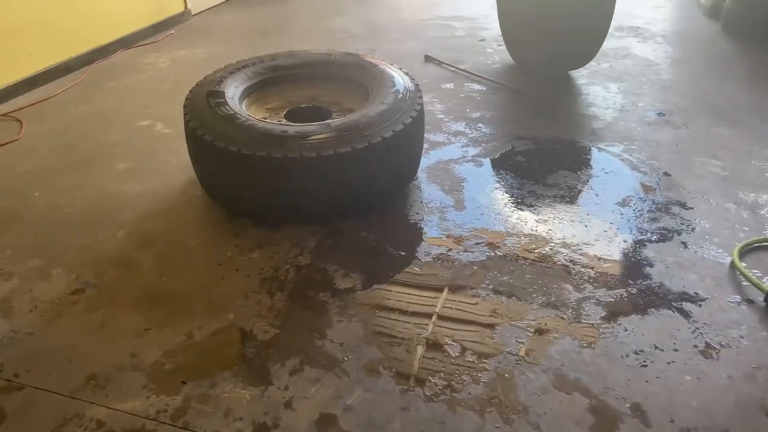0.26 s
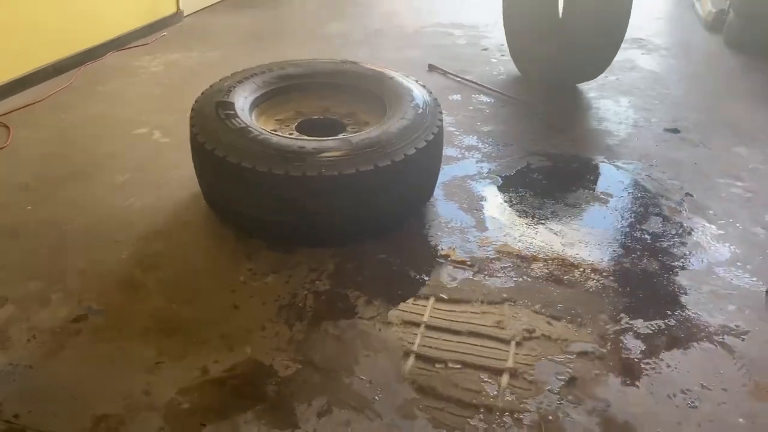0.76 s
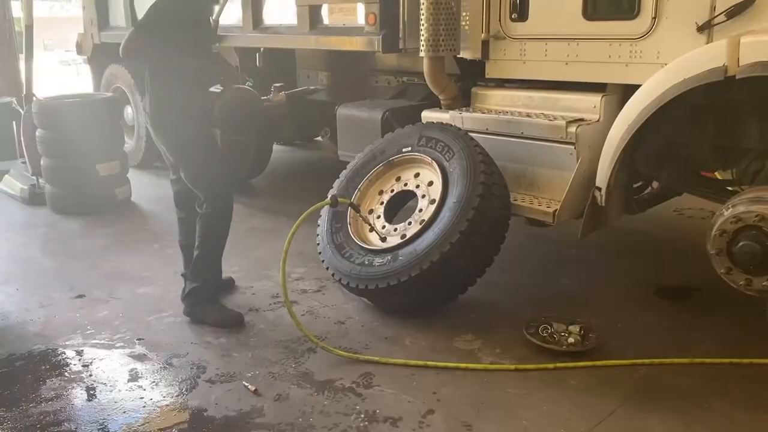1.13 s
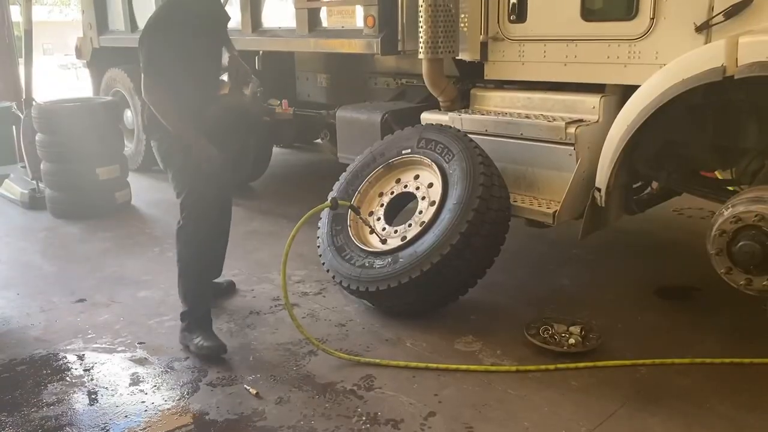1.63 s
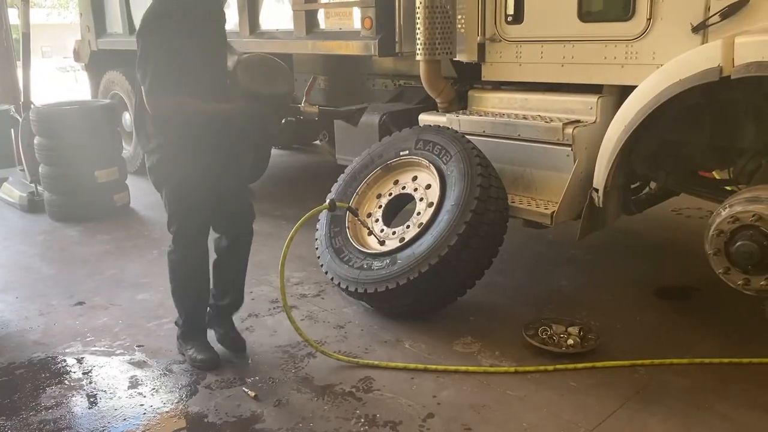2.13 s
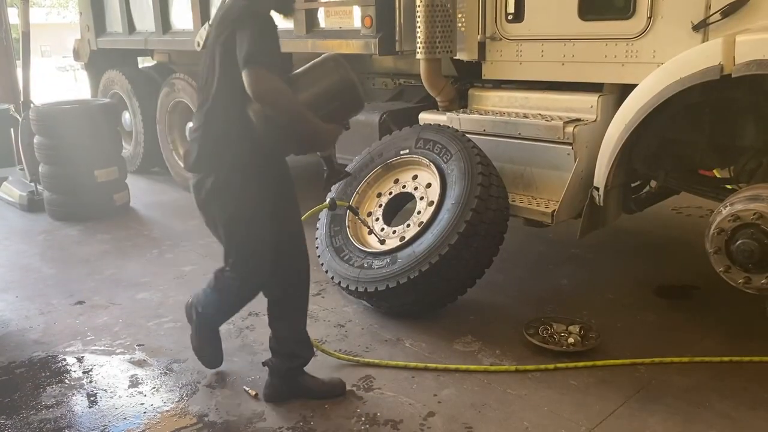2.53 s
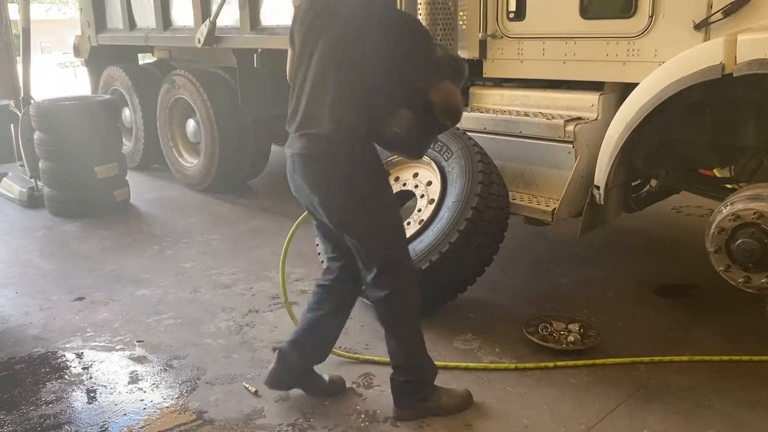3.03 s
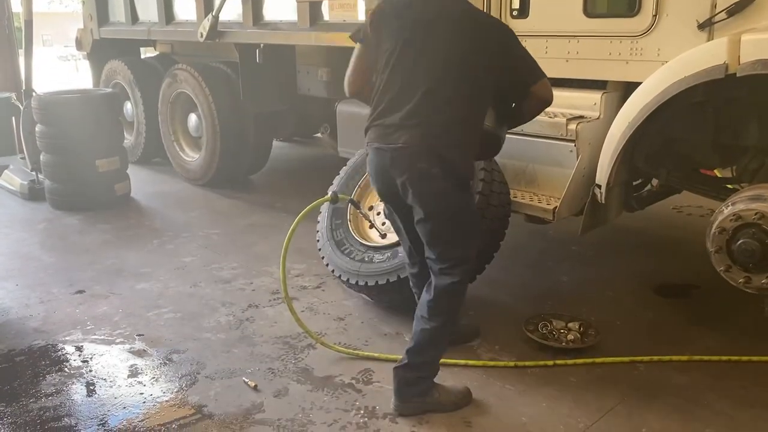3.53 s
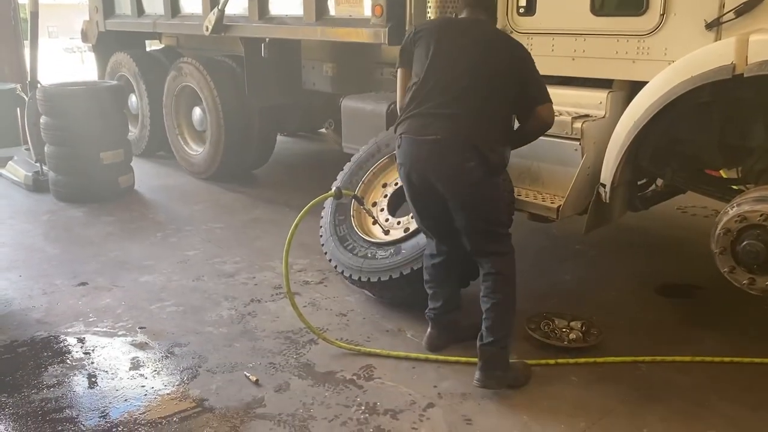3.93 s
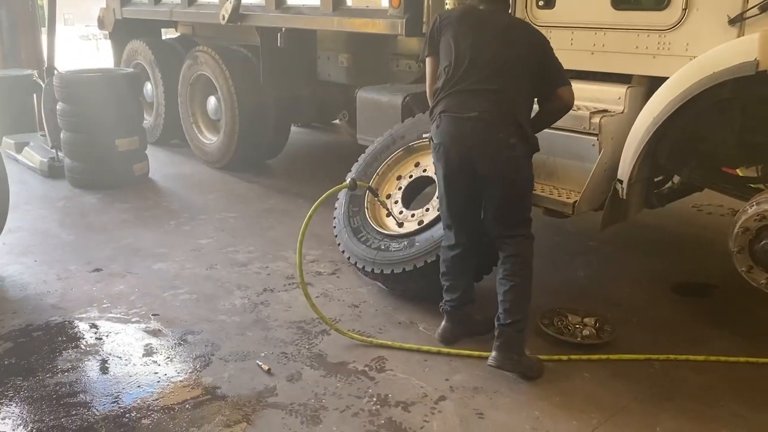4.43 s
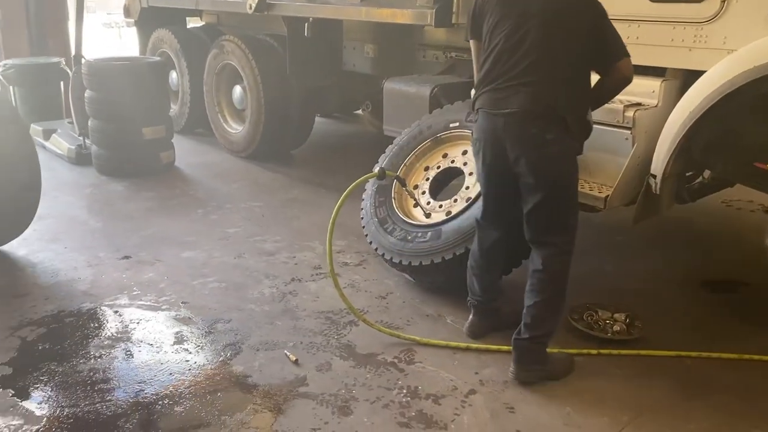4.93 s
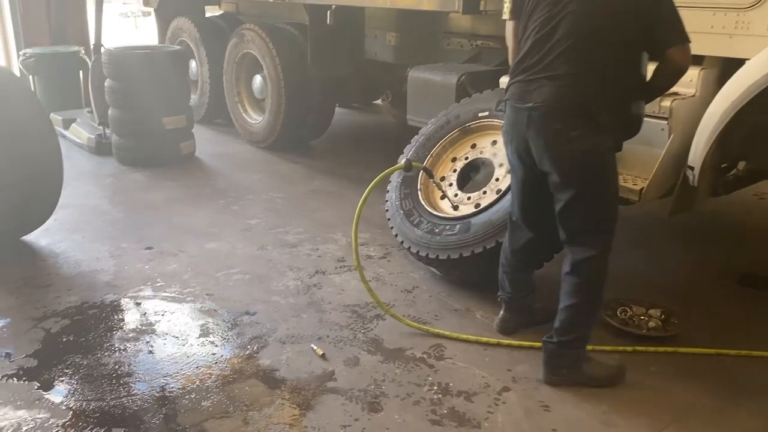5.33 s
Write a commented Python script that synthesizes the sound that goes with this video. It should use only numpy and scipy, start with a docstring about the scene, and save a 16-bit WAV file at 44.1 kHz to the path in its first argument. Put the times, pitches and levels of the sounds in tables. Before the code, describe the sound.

A quiet workshop wash with draught and soft knocks on the handheld microphone cuts abruptly to a bright, steady hose hiss with faint whistles, escaping past a truck tire's loose bead. Bumps and wind puffs continue. Steel clinks on the rim, then a tank fires one loud ragged air blast with a thump and short hoot; the hiss chokes off and the last air fades in the bay.

```python
"""Seating a truck tire, in two shots

In a workshop bay, a first shot has the shop alone; after a cut, hose air hisses and whistles past the loose bead:
coloured noise with narrow resonances. Through both, a draught and a hand bump the microphone: low noise puffs,
and decaying modes of its case. The barrel of an air tank clinks on the rim and fires one blast: noise through
resonances that shift as the gap narrows. The tire thumps, the blast hoots, the bead seals, the last air dies away."""
import sys
import numpy as np
from scipy import signal
from scipy.fft import rfft, irfft, next_fast_len
from scipy.io import wavfile

SR = 44100
rng = np.random.default_rng(int(sys.argv[2]) if len(sys.argv) > 2 else 0)


def unload_audio(sound):
    """Save the sound as a 16-bit wav file, at the path given as the first command line argument."""
    columns = np.transpose(np.atleast_2d(sound))
    # keep every value between -1 and 1, then stretch to whole-number steps
    steps = np.round(np.clip(columns, -1, 1) * 32767)
    wavfile.write(sys.argv[1], SR, steps.astype(np.int16))


N = 245637
TIME = np.arange(N) / SR
SIZE = next_fast_len(N + SR)
HZ = np.maximum(np.arange(SIZE // 2 + 1) * SR / SIZE, 1)
CUT_S = .952  # from the first shot to the second


def blast():
    """The tank dumps its air into the gap: a ragged roar whose resonances shift as the gap narrows."""
    # broad rush of the blast: f/Hz, relative level/dB per Hz
    rush_colour = [(150, -14), (400, -18), (780, -4), (1300, -7.5), (2100, -1), (2900, -2), (3700, -3),
                   (4300, -4), (5900, -2.5), (7000, -6), (8500, -12), (11000, -10), (15000, -21)]
    # resonances of the tank's barrel and the open gap: f/Hz, width/Hz, relative level/dB
    open_gap = [(970, 28, -10), (1520, 38, -7.5), (2320, 60, -9), (2796, 40, 1), (3130, 70, -2.5),
                (3576, 33, 1), (3770, 29, 3.5), (4460, 29, -5), (4820, 34, -6), (4715, 21, -5),
                (5420, 28, -1), (5760, 28, -2), (6260, 28, -2), (6430, 80, -3), (7060, 55, -6)]
    # resonances once the swelling tire has narrowed the gap: f/Hz, width/Hz, relative level/dB
    narrow_gap = [(2190, 120, 3.5), (2460, 47, -3), (2680, 25, -1), (2930, 110, -9), (3380, 45, -5),
                  (4650, 71, 5), (5800, 38, -3), (6340, 40, -2), (6900, 36, -1), (8100, 64, 1)]
    # the blast surges and sags as the tire starts to swell: t/s, gain/dB
    surges = [(4.474, 3.5), (4.488, 2), (4.499, 1.5), (4.511, 2.5), (4.526, 1.5), (4.536, -2.5),
              (4.55, 4.5), (4.615, 4.5), (4.648, 5), (4.7, -9)]
    # the valve's slam rings the tank's barrel: t/s, level/dB
    slam_hits = [(4.477, -30)]
    start_s, attack_s, hold_s, fall_db_per_s = 4.4705, .007, .02, 122
    narrows_after_s, narrows_for_s = 0.054, 0.024

    rush = turbulence(colour(rush_colour), side_db=-6.0) * from_db(-3)
    wide = turbulence(np.sqrt(resonances(open_gap)), side_db=-1.0) * from_db(-1.5)
    narrow = turbulence(np.sqrt(resonances(narrow_gap)), side_db=-1.0) * from_db(-6)
    narrowed = np.clip((TIME - start_s - narrows_after_s) / narrows_for_s, 0, 1)
    roar = torn(rush + wide * np.sqrt(1 - narrowed) + narrow * np.sqrt(narrowed))

    surge_db, = in_time(surges)
    rough_db = 1.4 * drift(rate=220)
    roar = roar * from_db(-13 + surge_db + rough_db) * envelope(start_s, attack_s, hold_s, fall_db_per_s)
    # a narrower resonance rings longer; the factor 1.6 stretches its decay
    barrel_modes = [(hz, db, np.log(1000) / (np.pi * width) * 1.6) for hz, width, db in open_gap]
    return roar + struck(slam_hits, barrel_modes)


def torn(x):
    """The jet tears unevenly: overlapping octave bands each swell and sag by themselves."""
    centres = 500 * 2 ** np.arange(5)
    out = 0
    for share in np.eye(len(centres)):
        octave = shaped(x, np.interp(np.log(HZ), np.log(centres), share))
        out = out + octave * from_db(2.0 * drift(rate=60))
    return out


def sidewalls():
    """The swelling sidewalls thump as a burst of low noise and bump the rim, ringing the tire's modes."""
    # the thump's low noise: f/Hz, relative level/dB per Hz
    thump_colour = [(35, -9), (70, 1), (170, -7), (330, 1), (600, -9), (1200, -16.5)]
    # bumps against the rim: t/s, level/dB
    bumps = [(4.545, -24.5), (4.563, -24.5)]
    # the tire's modes: f/Hz, relative level/dB, t60/s
    tire = [(88, -8, .12), (183, 0, .07), (332, -2, .04), (617, -2, .03)]
    thump = turbulence(colour(thump_colour), side_db=-1.0) * from_db(-26.5)
    thump = thump * envelope(4.54, attack_s=0.004, hold_s=0.025, fall_db_per_s=339)
    return thump + struck(bumps, tire)


def hoot():
    """The blast hoots in short sine notes, and the hollow tone swells in the tail; all sag and flutter."""
    # hoots and late swells: t/s, settled pitch f/Hz, level/dB, fall/dB per s
    notes = [(4.513, 791, -22.5, 450), (4.552, 1213, -14, 800), (4.573, 1099, -24.5, 380),
             (4.661, 1115, -39, 450), (4.706, 1240, -44, 500), (4.76, 1212, -37.5, 180),
             (4.85, 1215, -41, 292), (4.892, 1237, -47, 200), (5.03, 1218, -51, 78)]
    # each note starts sharp by a share of its pitch and settles
    attack_s, sharp_share, settle_s = 0.012, 0.042, 0.017
    out, waver = 0, 1 + 0.0167 * drift(rate=140)  # a rough pitch
    for s, hz, db, fall_db_per_s in notes:
        sag = 1 + sharp_share * np.exp(-np.maximum(TIME - s, 0) / settle_s)
        phase = 2 * np.pi * np.cumsum(hz * sag * waver) / SR
        # common part, and a weaker differing part a quarter cycle away
        tone = np.sqrt(2) * np.array([np.sin(phase), 0.45 * np.cos(phase)])
        out = out + tone * from_db(db) * envelope(s, attack_s, 0, fall_db_per_s)
    return out * from_db(2.5 * drift(rate=70))


def drain():
    """The last air leaves the tank as a hiss that gives out, and blows its barrel like a pipe."""
    # hiss of the emptying tank: f/Hz, relative level/dB per Hz
    drain_colour = [(600, -34), (900, -19), (1500, -6), (2100, -1), (3000, -2), (4000, -0.5), (5200, 0.5),
                    (6800, -3), (8500, -11), (11000, -15), (13000, -25), (15000, -46)]
    # the hollow tone's two resonances: f/Hz, width/Hz, relative level/dB
    hollow = [(1249, 59, 3.5), (1088, 130, 0)]
    attack_s, fall_db_per_s = 0.025, 67.5

    hiss = turbulence(colour(drain_colour) * near_echoes(share=0.24, longest_s=0.011), side_db=2.5)
    pipe_gain = sum(from_db(db) * resonance(hz, width) ** 2 for hz, width, db in hollow)
    tone = turbulence(pipe_gain, side_db=5.0)
    hiss = hiss * from_db(-34) * envelope(4.574, attack_s, 0.4, fall_db_per_s)
    tone = tone * from_db(-49) * envelope(4.745, attack_s, 0.32, fall_db_per_s)
    return hiss + tone


def hose():
    """A steady jet with faint whistles, in the second shot; the worker shades it, the sealing bead chokes it."""
    # hose air escaping past the bead: f/Hz, relative level/dB per Hz
    hiss_colour = [(1000, -15.5), (1400, -14), (1900, -9.5), (2400, -10), (3200, -6.5), (4200, -3.5),
                   (5600, -1), (7000, -.5), (11400, 1), (15200, -2)]
    # narrow resonances of the valve and the gap: f/Hz, width/Hz, level over the unshaded hiss/dB
    whistle_modes = [(2455, 37, 4), (2900, 78, 0.5), (3830, 54, 0), (5330, 160, 1), (6160, 140, 4),
                     (6520, 50, 6.5), (6800, 68, 9.5), (7380, 73, 4), (7740, 67, 7), (10320, 68, 6.5),
                     (11340, 90, 6.5)]
    bead_seals_s, seal_db_per_s = 4.6, 119
    # the worker steps in front of the jet
    shade_s, shade_takes_s = 3.07, 0.4
    shade = np.clip((TIME - shade_s) / shade_takes_s, 0, 1)

    air = turbulence(colour(hiss_colour), side_db=0.0)
    whistles = shaped(air, np.sqrt(1 + resonances(whistle_modes)) - 1)
    jet = air + whistles * from_db(-9 * shade + 0.97 * drift(rate=9.5))

    # the near echoes change as he walks about: two echo patterns trade places
    first = shaped(jet, near_echoes(share=0.52, longest_s=.024) - 1)
    second = shaped(jet, near_echoes(share=0.52, longest_s=.024) - 1)
    turn = 2 * np.pi * .55 * TIME  # 0.55 turns per second
    jet = rms_one(jet + np.cos(turn) * first + np.sin(turn) * second)

    # the sizzle, above some 7.5 kHz, is shaded more than the body
    body = shaped(jet, 1 / (1 + (HZ / 7500) ** 8))
    sizzle = jet - body
    jet = body * from_db(-21.5 - 1 * shade) + sizzle * from_db(-23.5 - 1.5 * shade)
    choke_db = seal_db_per_s * np.maximum(TIME - bead_seals_s, 0)
    return jet * (TIME > CUT_S) * from_db(0.43 * drift(rate=19.0) - choke_db)


def near_echoes(share, longest_s):
    """Floor, wheel and truck body return the jet within milliseconds and ripple its spectrum."""
    taps = np.zeros((2, SIZE))
    for channel in taps:
        delays = (rng.uniform(.1, 1, size=40) * longest_s * SR).astype(int)
        channel[delays] = rng.standard_normal(size=40)
    taps *= share / np.sqrt(np.sum(taps ** 2, axis=1, keepdims=True))
    taps[:, 0] = 1  # the direct sound
    return rfft(taps)


def clink():
    """Steel meets steel: the rim rings over a short, gritty scrape where the barrel lands."""
    # barrel touching the rim: t/s, level/dB
    touches = [(3.892, -26.5), (3.957, -38)]
    # the rim's steel modes: f/Hz, relative level/dB, t60/s
    rim = [(930, -6, .02), (1410, -8, 0.0079), (1890, 2, 0.1), (1890, -3, 0.11), (2342, 2, 0.051),
           (2940, 1, 0.037), (3720, -8, 0.083), (4600, -12, 0.018)]
    # grating of the barrel: f/Hz, relative level/dB per Hz
    grate_colour = [(800, -10), (1400, -3), (2100, 1), (3200, -3), (5000, -19), (10000, -35)]
    grit = turbulence(colour(grate_colour), side_db=3.0) * from_db(3.0 * drift(rate=320))
    # the scrape lies 8 dB under its touch
    scrape = sum(from_db(db - 8) * envelope(s, .001, .003, fall_db_per_s=300) for s, db in touches)
    return struck(touches, rim) + grit * scrape


def handling():
    """A hand knocks the microphone's case and wakes its modes; some knocks snap; scuffs rub as noise."""
    # knocks on the case: t/s, level/dB, f/Hz at which the contact rings
    knocks = [(0.122, -34, 560), (0.29, -33, 90), (0.337, -31, 447), (0.352, -30, 450), (0.36, -19.5, 420),
              (0.372, -32, 200), (0.402, -35, 564), (0.414, -26, 131), (0.629, -27, 290), (0.726, -30, 160),
              (0.798, -32, 220), (0.81, -36, 139), (0.823, -27, 420), (0.928, -30, 262), (1.009, -20, 413),
              (1.014, -22, 150), (1.024, -28, 189), (1.16, -33, 330), (1.172, -34, 202), (1.195, -31, 110),
              (1.198, -35, 445), (1.318, -29.5, 600), (1.337, -32, 474), (1.367, -28.5, 65),
              (1.415, -24.5, 560), (1.439, -19, 573), (1.442, -22, 240), (1.447, -19, 120),
              (1.461, -24, 302), (1.474, -27.5, 480), (1.488, -20, 98), (1.627, -27, 148),
              (1.805, -30.5, 170), (1.932, -25, 483), (1.939, -17.5, 188), (1.955, -26, 80),
              (1.995, -32, 298), (2.02, -35, 300), (2.094, -38, 220), (2.374, -35, 378),
              (2.422, -23.5, 230), (2.443, -16.5, 320), (2.54, -26.5, 260), (2.563, -29, 460),
              (2.639, -29.5, 360), (2.841, -17, 175), (2.85, -24, 330), (2.873, -22.5, 300),
              (2.892, -20, 190), (3.012, -23.5, 460), (3.037, -26, 210), (3.067, -23.5, 297),
              (3.138, -35, 450), (3.223, -34, 400), (3.298, -36, 480), (3.321, -27, 101), (3.469, -33, 232),
              (3.677, -32, 149), (3.798, -23.5, 242), (3.821, -24, 167), (3.86, -35, 220),
              (3.903, -33, 300), (3.966, -29, 189), (4.325, -20, 99), (4.354, -24.5, 382),
              (4.368, -23.5, 204)]
    # the case's modes before detuning: f/Hz, relative level/dB, t60/s
    case = [(67.5, -3, 0.33), (99, 2.5, 0.051), (220, -5.5, 0.041), (412, 5.5, 0.021), (572, -0.5, 0.031),
            (860, -7.5, 0.021)]
    # snaps with some of the knocks: t/s, level/dB, f/Hz above which the snap is dull
    snaps = [(0.358, -30, 2490), (0.402, -32, 1500), (1.4375, -18.5, 4000), (1.932, -29, 1400),
             (2.537, -28.5, 1100)]
    # the snap's modes: f/Hz, relative level/dB, t60/s
    snap_modes = [(694, 1.5, 0.014), (1010, 2.5, 0.0092), (1400, -5, .006), (2000, -7, .005),
                  (2600, 1, .004), (3250, 4, 0.0045)]
    # fingers scuffing the case: t/s, level/dB, fall/dB per s
    scuffs = [(0.357, -45, 480), (0.401, -52, 500), (1.438, -33, 900), (1.448, -37, 94), (1.93, -41, 699)]
    # noise of a scuff: f/Hz, relative level/dB per Hz
    scuff_colour = [(500, 0), (1000, -2), (2200, -3.5), (3500, -10), (6000, -28), (12000, -45)]
    out = 0
    for s, db, contact_hz in knocks:
        # each knock's case modes are detuned together at random, by up to a quarter octave
        detune = 2 ** (.2 * rng.uniform(-1.23, 1))
        ringing = [(contact_hz, -1, 8.7 / contact_hz)]  # dies 60 dB in 8.7 cycles
        for hz, mode_db, t60 in case:
            # modes far from the contact's pitch are woken less
            far_db = 10 * np.log10(1 + 1.7 * (hz / contact_hz - contact_hz / hz) ** 2)
            ringing.append((hz * detune, -5 + mode_db - far_db, t60))
        out = out + struck([(s, db)], ringing)
    for s, db, dull_hz in snaps:
        dulled = [(hz, mode_db - 10 * np.log10(1 + (hz / dull_hz) ** 8), t60)
                  for hz, mode_db, t60 in snap_modes]
        out = out + struck([(s, db)], dulled)
    rub = turbulence(colour(scuff_colour), side_db=2.0) * from_db(3.1 * drift(rate=500))
    return out + rub * sum(from_db(db) * envelope(s, 0.0029, .003, fall) for s, db, fall in scuffs)


def wind():
    """Draught on the microphone: strong and weak gusts over a rumble that swells around the strong ones."""
    # strong gusts: t/s, nominal length/s, level/dB before the puff's trim, corner f/Hz
    gusts = [(0.116, 0.059, -43.5, 350), (0.301, 0.038, -39, 170), (0.368, 0.025, -35, 200),
             (0.407, 0.031, -36, 180), (0.808, 0.023, -32.5, 202), (0.933, 0.039, -39, 300),
             (1.017, 0.021, -33, 282), (1.203, 0.079, -36, 130), (1.473, 0.092, -35, 210),
             (1.944, 0.031, -32.5, 188), (2.235, 0.048, -44, 79), (2.432, 0.042, -33.5, 190),
             (2.549, 0.025, -38, 200), (2.784, 0.038, -36.5, 70), (2.858, 0.056, -33.5, 191),
             (3.047, 0.057, -37, 250), (3.229, 0.036, -49.5, 231), (3.474, 0.027, -42.5, 170),
             (3.833, 0.1, -40, 220), (3.96, 0.029, -36, 160), (4.339, 0.052, -33, 125.5),
             (4.413, 0.013, -36.5, 80.6), (4.925, 0.084, -53, 257)]
    # course of the draught, which sets rumble and weak gusts: t/s, reference level/dB
    draught = [(0, -60), (.12, -52), (.42, -46), (.52, -47), (.8, -47), (1.08, -53), (1.4, -43.5),
               (1.62, -48), (1.71, -57), (1.82, -48.5), (2.14, -50), (2.52, -65), (2.8, -50), (3.3, -52.5),
               (3.6, -61), (4.2, -58), (4.5, -58), (4.68, -71), (4.82, -61), (5.15, -75), (5.57, -74)]
    # rumble of the draught: f/Hz, relative level/dB per Hz
    draught_colour = [(22, -28), (40, -1), (60, 5.5), (110, -1.5), (200, -11), (400, -15.5), (900, -71)]
    # how differently the eddies hit the two ports: t/s, gain of the differing part/dB
    wind_width = [(0.93, 6.5), (0.98, -2.5)]
    swell_db, swell_s = -8, 0.1

    draught_db, = in_time(draught)
    swells = sum(from_db(db + swell_db) ** 2 * np.exp(-((TIME - s) / swell_s) ** 2) for s, _, db, _ in gusts)
    level = np.sqrt(from_db(draught_db + 5) ** 2 + swells)
    rumble = turbulence(colour(draught_colour), side_db=2.0) * level * from_db(2.5 * drift(rate=17.0))
    common, differing = rumble + puffs(gusts + weak_gusts(draught_db, count=30))
    width_db, = in_time(wind_width)
    return np.array([common, differing * from_db(width_db)])


def weak_gusts(draught_db, count):
    """Small eddies scattered loosely through time, their level following the draught's."""
    over_db, spread_db, length_s, middle_corner_hz = 4, -1, 0.019, 300
    chance = rng.random((count, 3)) * 2 - 1
    at = ((np.arange(count) + .5 + .5 * chance[:, 0]) * N / count).astype(int)
    return [(i / SR, length_s, draught_db[i] + over_db + spread_db * strength, middle_corner_hz * 2 ** (.5 * size))
            for i, (_, strength, size) in zip(at, chance)]


def puffs(rows):
    """Each eddy hits the ports as a short puff of low-passed noise."""
    out, low_cut = np.zeros((2, N)), signal.butter(2, 55, "high", fs=SR, output="sos")
    for s, length, db, corner_hz in rows:
        near = np.flatnonzero(abs(TIME - s) < .15)
        eddy = signal.butter(2, corner_hz, fs=SR, output="sos")
        noise = rng.standard_normal((2, SR // 3))[:, :len(near)]
        puff = signal.sosfilt(np.vstack([low_cut, eddy]), noise)
        # a puff arrives faster than it leaves, and carries its level over its length
        age = (TIME[near] - s) / (0.59 * length)
        puff /= 1 + abs(age) ** np.where(age < 0, 5.0, 2.8)
        puff *= np.sqrt(length * SR / np.sum(puff ** 2, axis=1, keepdims=True))
        out[:, near] += from_db(db + 2.1) * puff
    return out


def shop():
    """A dull noise wash of distant machinery, louder in the first shot, much quieter after the cut."""
    # shop in the first shot: f/Hz, relative level/dB per Hz
    first_colour = [(500, -2.5), (1000, -4.5), (1600, -9), (2500, -6), (3500, -13), (5000, -14.5),
                    (6500, -21.5), (8000, -29.5), (11000, -36.5), (15000, -55.5)]
    # shop in the second shot: f/Hz, relative level/dB per Hz
    second_colour = [(60, -13), (150, -11), (400, -3), (700, -2.5), (1200, 2), (2500, -1), (5000, -5.5),
                     (8000, -13), (11000, -18), (15000, -22.5)]
    first = turbulence(colour(first_colour), side_db=5.0) * from_db(-45.5) * (TIME < CUT_S)
    second = turbulence(colour(second_colour), side_db=2.0) * from_db(-56.0) * (TIME >= CUT_S)
    return first + second


def bay(x, wet_db):
    """The bay's diffuse tail: noise in which each band dies at its own rate."""
    # reverberation of the bay: f/Hz, t60/s
    bay_t60 = [(100, 0.28), (600, 0.1), (1200, 0.72), (4000, 0.63), (8000, 0.45), (15000, 0.65)]
    t, tail = TIME[:SR], 0
    edges = np.geomspace(70, 17000, 9)
    for low, high in zip(edges, edges[1:]):
        band_pass = signal.butter(2, [low, high], "band", fs=SR, output="sos")
        band = signal.sosfilt(band_pass, rng.standard_normal((2, SR)))
        tail = tail + band * from_db(-60 * t / at_hz(bay_t60, np.sqrt(low * high)))
    tail = tail * (1 - np.exp(-t / 0.015))  # the tail builds up softly
    return x + from_db(wet_db) * shaped(x[0], rfft(rms_one(tail) / np.sqrt(SR), SIZE))


def microphones(x, lag_s, in_step_hz):
    """Two ports a few centimetres apart share some bands more than others; the right leads in the treble."""
    # left-right likeness for equal common and differing parts: f/Hz, correlation
    likeness = [(60, .8), (300, .6), (700, .25), (1300, .2), (2600, .5), (4200, .45), (5500, .2),
                (7000, .85), (8600, .995), (15000, .995)]
    # balance of the ports: f/Hz, left minus right level/dB
    lean = [(60, .5), (300, 1.7), (700, 1.6), (2000, -.5), (5500, -1.3), (8000, 0)]
    alike = np.clip(at_hz(likeness), -.998, .998)
    common, differing = shaped(x, np.sqrt([1 + alike, 1 - alike]) / np.sqrt(2))
    # half the lean and half the lag go to each port, in opposite senses
    lag = np.exp(-1j * np.pi * lag_s * np.maximum(HZ - in_step_hz, 0))
    turn = from_db(at_hz(lean) / 2) * lag
    return shaped(np.array([common + differing, common - differing]), np.array([turn, 1 / turn]))


def struck(hits, modes):
    """Each hit sets all modes of a body ringing as decaying sines, differently at the two ports."""
    out, age = np.zeros((2, N)), TIME[:SR // 3]
    for s, db in hits:
        start = round(s * SR)
        for k, (hz, mode_db, t60) in enumerate(modes):
            # signs and strengths of the common and the differing part
            strength = np.array([[(-1) ** k], [rng.choice([-1, 1]) * from_db(-0.5)]])
            ring = from_db(db + mode_db - 60 * age / t60) * np.sin(2 * np.pi * hz * age)
            out[:, start:start + len(age)] += strength * ring
    return out


def turbulence(gain, side_db):
    """Coloured noise as a (common, differing) pair for the two ports."""
    return rms_one(shaped(rng.standard_normal((2, N)), gain)) * from_db([[0], [side_db]])


def drift(rate):
    """Slow chance of rms 1, wandering up to about the given rate in Hz."""
    return rms_one(shaped(rng.standard_normal(N), 1 / (1 + (HZ / rate) ** 2)))


def envelope(start_s, attack_s, hold_s, fall_db_per_s):
    """Gain that rises to 1, holds, then dies away."""
    age = TIME - start_s
    return np.clip(age / attack_s, 0, 1) * from_db(-fall_db_per_s * np.maximum(age - attack_s - hold_s, 0))


def resonance(hz, width_hz):
    """Gain of one resonance, 1 on top."""
    return 1 / np.sqrt(1 + ((HZ ** 2 - hz ** 2) / (HZ * width_hz)) ** 2)


def resonances(modes):
    """Summed power of several resonances."""
    return sum((from_db(db) * resonance(hz, width)) ** 2 for hz, width, db in modes)


def colour(points):
    """Gain per frequency, falling away below the first point."""
    return from_db(at_hz(points)) / np.sqrt(1 + (.5 * points[0][0] / HZ) ** 4)


def at_hz(points, hz=HZ):
    """Read a table on a log-frequency axis."""
    return np.interp(np.log(hz), np.log(np.array(points)[:, 0]), np.array(points)[:, 1])


def in_time(rows):
    """Each column of a curve at every sample."""
    s, *columns = np.transpose(rows)
    return [np.interp(TIME, s, c) for c in columns]


def shaped(x, gain):
    """Filter by a gain per frequency."""
    return irfft(rfft(x, SIZE) * gain, SIZE)[..., :N]


def rms_one(x):
    """Scale to rms 1."""
    return x / np.sqrt(np.mean(x ** 2) + 1e-20)


def from_db(db):
    """Decibels to gain."""
    return 10 ** (np.asarray(db) / 20)


def scene():
    """All sources at the two ports; the tank, the tire and the clinks also ring in the bay."""
    tank = bay(blast() + sidewalls() + drain() + clink(), wet_db=-12.0)
    tank = tank + bay(hoot(), wet_db=-18.0)
    at_ports = tank + hose() + handling() + wind() + shop()
    return microphones(at_ports, lag_s=0.00023, in_step_hz=6807)


def record(dry):
    """The deepest bass is filtered out, peaks are rounded, the top is cut."""
    cutoff_hz = 15750
    thinned = signal.sosfilt(signal.butter(2, 36, "high", fs=SR, output="sos"), dry)
    rounded = 1.3 * np.tanh(thinned / 1.3)
    return shaped(rounded, 1 / np.sqrt(1 + (HZ / cutoff_hz) ** 300))


dry = scene()
out = record(dry)
unload_audio(out)
```